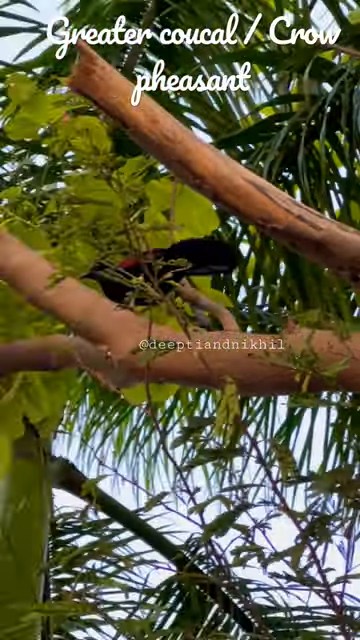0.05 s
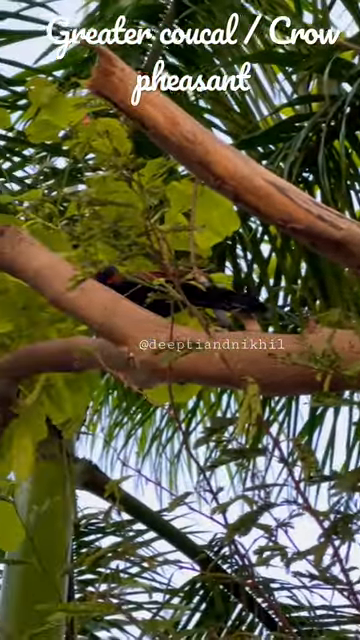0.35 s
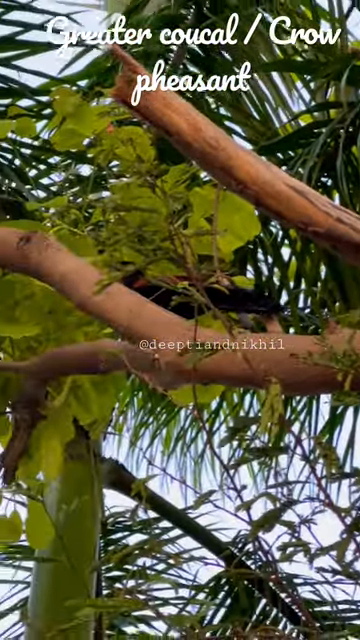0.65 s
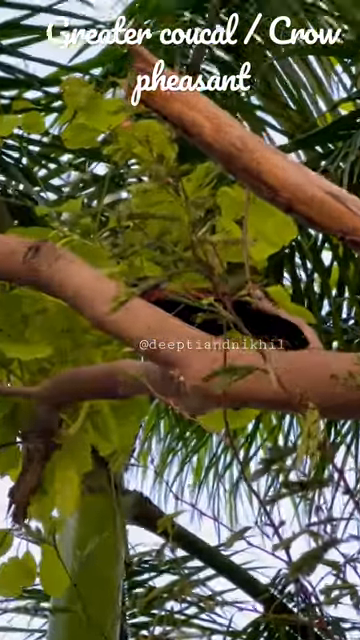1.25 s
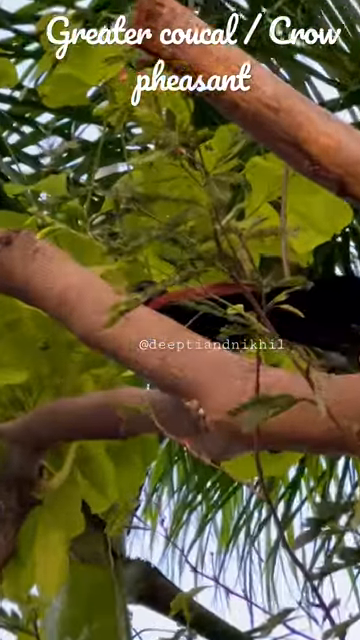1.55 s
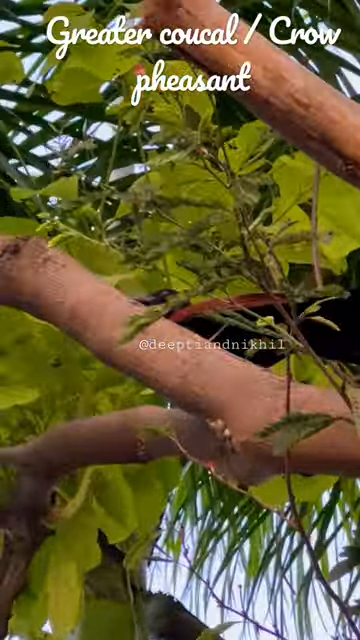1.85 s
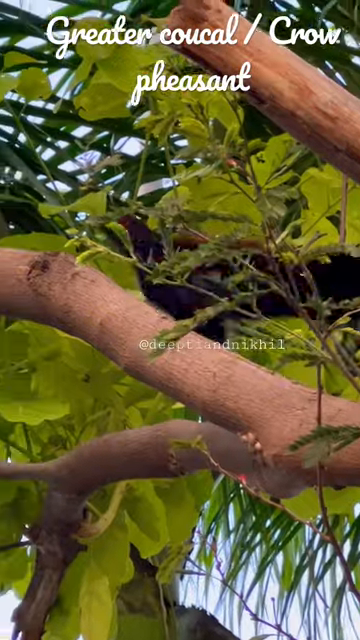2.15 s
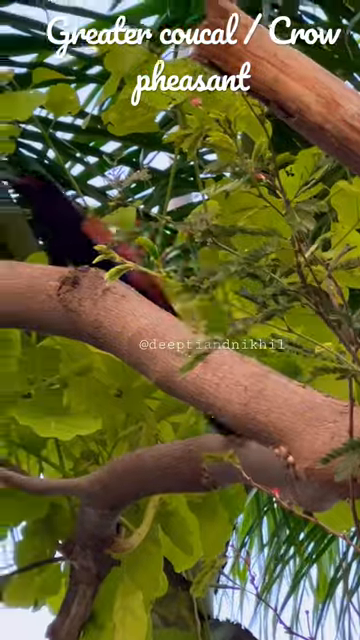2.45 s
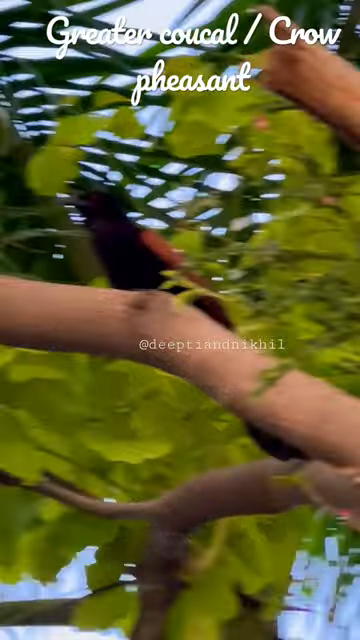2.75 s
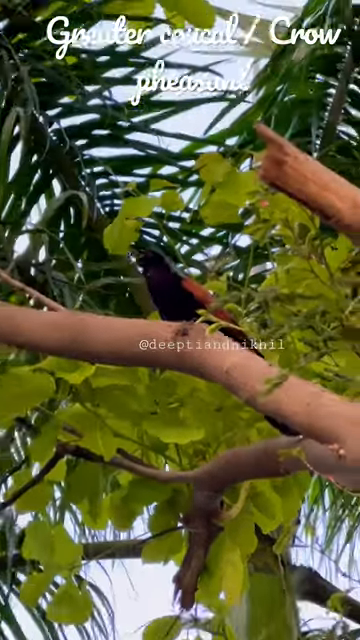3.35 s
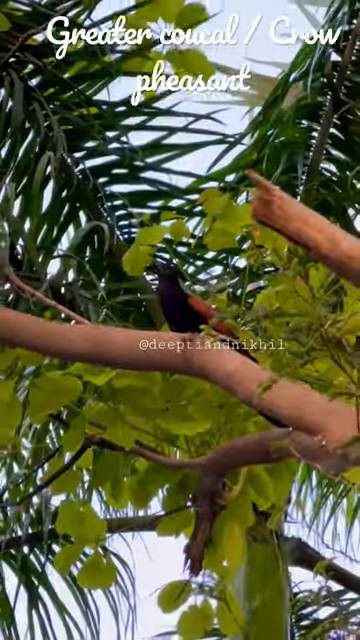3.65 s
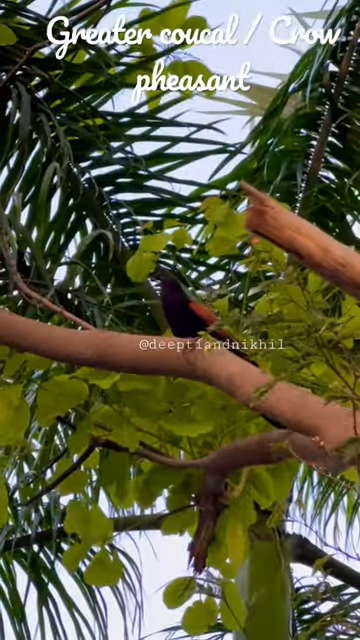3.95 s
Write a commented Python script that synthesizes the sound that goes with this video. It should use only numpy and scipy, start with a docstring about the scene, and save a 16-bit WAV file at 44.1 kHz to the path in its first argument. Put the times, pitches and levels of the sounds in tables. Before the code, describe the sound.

Birds trade short, low, hollow hoots in a leafy garden with faint chirps behind.

```python
"""A leafy garden where two coucals trade short, hollow hoots: one close and dry, one farther off
and echoing. Each hoot is a nearly pure tone from a swollen throat that dips in pitch and lifts again.
Small birds chirp faintly, twigs snap, leaves brush, and the hand-held microphone is bumped early on.
A distant engine hums under the hush of far traffic and foliage."""
import sys
import numpy as np
from scipy import signal
from scipy.io import wavfile

SR = 44100
rng = np.random.default_rng(int(sys.argv[2]) if len(sys.argv) > 2 else 0)


def generate_wav(signal):
    """Clip the signal to [-1, 1] and save it as 16-bit WAV at the path in sys.argv[1]."""
    frames = np.transpose(np.atleast_2d(signal))
    scaled = np.clip(frames, -1, 1) * 32767
    pcm = np.round(scaled).astype(np.int16)
    wavfile.write(sys.argv[1], SR, pcm)


N = 176400
TIME = np.arange(N) / SR
CUTOFF_HZ = 15100

# how alike left and right are for distant sound: f/Hz, likeness/0-1
LIKENESS = [(60, 1), (170, 0.98), (350, 0.6), (650, 0.3), (1300, 0.62), (2500, 0.79), (5000, 0.3),
            (11000, 0.3)]


def from_db(db):
    """Decibels to gain."""
    return 10 ** (np.asarray(db) / 20)


def unit_rms(x):
    """Scale to rms 1."""
    return x / np.sqrt(np.mean(x ** 2) + 1e-20)


def in_time(rows):
    """Join (t/s, value) rows by straight lines."""
    return np.interp(TIME, *np.transpose(rows))


def at_hz(rows, hz):
    """Read (f/Hz, value) rows on a log-frequency axis."""
    freqs, values = np.transpose(rows)
    return np.interp(np.log(hz), np.log(freqs), values)


def ease(x):
    """Smooth step from 0 to 1."""
    return .5 - .5 * np.cos(np.pi * np.clip(x, 0, 1))


def band(x, low_hz, high_hz):
    """Butterworth band-pass."""
    return signal.sosfilt(signal.butter(2, [low_hz, high_hz], "band", fs=SR, output="sos"), x + 1e-18)


def resonance(x, hz, width_hz):
    """One resonance, gain 1 at its peak."""
    return signal.lfilter(*signal.iirpeak(hz, hz / width_hz, fs=SR), x + 1e-18)


def drift(rate_hz):
    """Slow random wander, rms 1."""
    hop, settle = 40, 2000
    pole = np.exp(-2 * np.pi * rate_hz * hop / SR)
    white = rng.standard_normal(N // hop + settle + 2)
    slow = signal.lfilter([1], [1, -2 * pole, pole * pole], white)[settle:]
    return np.interp(np.arange(N) / hop, np.arange(len(slow)), unit_rms(slow))


def tone(hz):
    """Sine that follows a pitch curve."""
    return np.sin(2 * np.pi * np.cumsum(hz) / SR)


def stereo(mid, side, alike):
    """Mid and side to left and right: likeness 1 is mono, 0 is wide."""
    return np.sqrt((1 + alike) / 2) * mid + np.sqrt((1 - alike) / 2) * side * np.array([[1], [-1]])


def stereo_noise(alike, samples=N):
    """White noise with the given left-right likeness."""
    return stereo(*rng.standard_normal((2, samples)), alike)


def foliage(x, t60_s, alike, build_s):
    """Diffuse scatter from leaves and trunks: a reverb tail of dying noise."""
    t = TIME[:SR]
    fade = from_db(-60 * t / t60_s) * ease(t / build_s)
    tail = stereo_noise(alike, SR) * fade / np.sqrt(np.sum(fade ** 2))
    return signal.fftconvolve(x[None], tail, axes=1)[:, :N]


def hush():
    """Far traffic and leaves: a bed of flickering third-octave noise bands with a few faint whines."""
    # spectrum of the bed: f/Hz, relative density/dB
    spectrum = [(22, -25.5), (35, -8), (50, 2.5), (75, -1), (110, -1.5), (170, -6.5), (260, -13),
                (480, -15), (850, -19.5), (1350, -20.5), (2050, -24), (2800, -28), (4000, -33.5),
                (5800, -40), (7400, -42.5), (9000, -47.5), (12500, -51), (15000, -65.5)]
    # slow swell of the midrange and the whines: t/s, gain/dB
    midrange_swell = [(0, 1.5), (.7, -1), (1.1, 0), (1.4, 2), (2.2, 2), (3.0, 1), (4, 0.5)]
    # narrow tones in the bed: f/Hz, width/Hz, level before the swell/dB
    whine_bands = [(637, 39, -65.5), (916, 15, -63), (1034, 22, -64), (1220, 97, -58), (1461, 30, -59.5),
                   (1990, 160, -62), (2355, 20, -67.5), (7200, 320, -77.5)]
    swell_db = in_time(midrange_swell)
    edges = 20 * 2 ** (np.arange(30) / 3)
    white = rng.standard_normal((2, 2, N + SR // 2))
    bed, flicker_db = 0, 1.0
    for k, (low, high) in enumerate(zip(edges, edges[1:])):
        hz = np.sqrt(low * high)
        mid, side = band(white[k % 2], low, high)[:, -N:]
        midrange_share = np.exp(-(np.log2(hz / 1210) / 1.9) ** 2)
        band_db = at_hz(spectrum, hz) + midrange_share * swell_db + flicker_db * drift(8.8)
        bed += from_db(band_db) * stereo(mid, side, at_hz(LIKENESS, hz))
    whines = sum(from_db(db) * unit_rms(resonance(stereo_noise(at_hz(LIKENESS, hz)), hz, width))
                 for hz, width, db in whine_bands)
    pan = from_db([[0.17], [-0.17]])
    return (from_db(-39.5) * unit_rms(bed) + from_db(swell_db) * whines) * pan


def engine():
    """The low orders of a far engine hum, wavering a little in pitch and level."""
    # fader ride of the hum: t/s, level/dB
    ride = [(0, -41.5), (1.1, -57), (1.5, -42), (2.0, -37), (2.8, -38.5), (3.5, -37), (4, -50.5)]
    # engine orders: multiple of the turning rate, relative level/dB
    orders = [(2, -8.5), (3, -2), (4, -4), (7, -14.5)]
    turning_hz = 20.41 * (1 + .012 * drift(1.51))
    hum = sum(from_db(db + 2.5 * drift(1.9)) * tone(order * turning_hz) for order, db in orders)
    return from_db(in_time(ride)) * hum


def leaves():
    """Leaves brush together in soft swells of high noise."""
    # rustles: centre t/s, half length/s, level/dB, low f/Hz, high f/Hz
    rustles = [(0.05, 0.081, -58, 4740, 5640), (0.756, 0.076, -61.5, 3300, 9000),
               (1.974, 0.02, -67, 6090, 11010)]
    out = np.zeros((2, N))
    for centre, half_length, db, low_hz, high_hz in rustles:
        swell = np.exp(-((TIME - centre) / half_length) ** 2)
        out += from_db(db) * swell * unit_rms(band(stereo_noise(alike=0.48), low_hz, high_hz))
    return out


def small_birds():
    """Thin distant whistles, most sliding down and levelling off, blurred by the leaves around them."""
    # chirps: t/s, length/s, level/dB, opening f/Hz, closing f/Hz
    chirps = [(.212, 0.027, -44, 3020, 2920), (0.24, 0.063, -56.5, 3000, 2991),
              (1.409, 0.058, -52, 3026, 2930), (1.41, 0.045, -66, 6000, 5850),
              (1.662, 0.063, -50.5, 2750, 2693), (2.191, 0.093, -49.5, 3270, 2845),
              (2.398, 0.022, -53, 4580, 4560), (2.436, 0.085, -52.5, 3060, 2850),
              (2.691, 0.025, -53.5, 4720, 4530), (2.75, 0.066, -52.5, 3090, 2880),
              (3.263, 0.061, -51, 2970, 2990), (3.273, 0.07, -49.5, 2873, 2877),
              (3.278, 0.12, -53, 3315, 3300), (3.356, 0.092, -49, 3015, 2980),
              (3.382, 0.07, -53.5, 2880, 2864), (3.576, 0.12, -58.5, 2940, 2880)]
    whistles = np.zeros(N)
    quaver = 1 + 0.0074 * drift(130)
    edge_s = .012
    for start, length, db, open_hz, close_hz in chirps:
        t = TIME - start
        hz = close_hz + (open_hz - close_hz) * (1 - np.clip(t / length, 0, 1)) ** 2
        whistles += from_db(db) * ease(t / edge_s) * ease((length - t) / edge_s) * tone(hz * quaver)
    alike = at_hz(LIKENESS, 3020)
    blur = foliage(whistles, t60_s=0.078, alike=alike, build_s=edge_s)
    tail = foliage(whistles, t60_s=0.99, alike=alike, build_s=0.06)
    return from_db(-1.5) * whistles + from_db(-5) * blur + from_db(-7) * tail


def twigs():
    """Wood snaps in short cracks of noise; each sets a thick branch or a thin twig ringing."""
    # snaps: t/s, crack level/dB, decay/s, top f/Hz, kind of wood, ring level/dB
    snaps = [(0.0405, -32.5, 0.0016, 3700, "branch", -25.5), (0.0448, -38, 0.0047, 4630, "branch", -39),
             (.066, -43, 0.023, 2800, "branch", -42), (1.945, -42.5, 0.0043, 4950, "twig", -32),
             (1.9505, -45.5, 0.007, 6000, "twig", -40), (1.959, -42.5, 0.01, 4400, "twig", -46)]
    # modes of each kind of wood: f/Hz, width/Hz, relative level/dB
    wood_modes = {"branch": [(566, 100, -3), (750, 100, 0), (1450, 110, -6.5), (1770, 120, -7),
                  (2250, 150, -6.5), (3370, 280, -5.5), (4600, 86, -21)], "twig": [(1700, 380, -6),
                  (2510, 190, -1), (3950, 130, -6), (6540, 160, -15.5)]}
    out = np.zeros((2, N))
    for start, db, decay, top_hz, wood, ring_db in snaps:
        t = np.maximum(TIME - start, 0)
        burst = from_db(db) * stereo_noise(alike=0.48) * (t > 0) * np.exp(-t / decay)
        crack = signal.sosfilt(signal.butter(4, top_hz, fs=SR, output="sos"), burst + 1e-18)
        makeup_gain = np.sqrt(SR / 2 / top_hz)
        out += makeup_gain * band(crack, 1300, CUTOFF_HZ)
        for k, (hz, width, mode_db) in enumerate(wood_modes[wood]):
            ring = np.exp(-np.pi * width * t) * np.sin(2 * np.pi * hz * t)
            out += (-1) ** k * from_db(ring_db + mode_db) * ring
    return out


def handling():
    """A hand on the microphone: dull single-swing bumps over the rumble of the grip."""
    # rumble of the grip: t/s, level/dB
    grip = [(0, -37.5), (.1, -33), (.19, -40), (.31, -40), (.40, -29.5), (.48, -35), (.56, -40), (.68, -41),
            (.85, -63), (1.2, -70)]
    # bumps: t/s, peak level/dB, f/Hz
    bumps = [(0.075, -29, 100), (.103, -21.5, 140), (0.139, -24.5, 150), (.364, -25.5, 150),
             (.380, -25, 115), (0.394, -19, 135), (0.413, -19, 157), (0.443, -26, 136), (0.47, -25, 149),
             (0.514, -15, 170)]
    out = from_db(in_time(grip)) * unit_rms(band(stereo_noise(alike=0.98), 74, 142))
    for centre, db, hz in bumps:
        phase_squared = (np.pi * hz * (TIME - centre)) ** 2
        out += from_db(db) * (2 * phase_squared - 1) * np.exp(-phase_squared)
    return out


def garden_echo(direct, send):
    """Walls and trees return the send as early echoes; foliage adds a tail, even to the closest hoots."""
    # reflections: delay/s, gain/dB
    reflections = [(0.018, -9.5), (0.0229, -10.5), (0.0396, -13.5), (0.0493, -12), (0.0918, -10.5),
                   (0.1123, -14)]
    echoes = sum(from_db(db) * np.interp(TIME - delay, TIME, send, left=0) for delay, db in reflections)
    tail_feed = from_db(-12.5) * send + from_db(-26.5) * direct
    return echoes + foliage(tail_feed, t60_s=0.9, alike=0.72, build_s=0.06)


def coucals():
    """Hollow hoots from a swollen throat fall quickly, then climb; the farther ones carry more echo."""
    # hoots: t/s, length/s, level before the throat/dB, swell over the hoot/dB, opening f/Hz,
    # lowest f/Hz, closing f/Hz, middle of the fall/s, fall length/s, echo send/dB
    hoots = [(-0.064, 0.132, -19.5, -16.5, 335, 314, 349, 0.03, 0.03, -17),
             (0.193, 0.14, -12, 3.5, 383.5, 348.4, 385.7, 0.035, 0.028, -24.5),
             (0.345, 0.12, -34.5, -16, 388, 366.4, 384, 0.05, 0.035, -16),
             (0.598, 0.14, -13.5, 1.5, 374.8, 336.3, 373, 0.033, 0.031, -17),
             (1.301, 0.1367, -24, 9, 312, 303, 354, 0.025, 0.04, -5.5),
             (1.744, 0.1455, -21.5, -6, 427.5, 337.3, 380, 0.038, 0.024, -1.5),
             (2.174, 0.154, -20.8, -3.5, 428, 334.2, 374.6, 0.039, 0.023, -1),
             (2.589, 0.14, -21, -0.8, 439.5, 321.8, 349.3, 0.033, 0.03, -3),
             (2.993, 0.12, -21, 1.5, 383, 317.8, 334.5, 0.022, 0.027, -3),
             (3.36, 0.12, -22, 3, 346.6, 309.7, 326, 0.03, 0.026, -5.5),
             (3.503, 0.15, -17.5, 18, 320.3, 312.4, 353, 0.031, 0.033, -17),
             (3.904, 0.14, -11.5, 4, 363.3, 335, 363.8, 0.034, 0.024, -19)]
    attack_s, release_s = 0.023, 0.024
    rise_start_s, top_hold_s = 0.052, 0.011   # the climb tops out just before the end
    throat_top_hz = 404   # the throat radiates weakly above this pitch
    quaver = 1 + 0.0012 * drift(40)
    flutter = from_db(0.28 * drift(45))
    direct, send = np.zeros((2, N))
    for start, length, db, swell_db, open_hz, low_hz, close_hz, fall_at, fall_s, send_db in hoots:
        t = TIME - start
        fall = ease((t - fall_at) / fall_s + .5)
        rise = ease((t - rise_start_s) / (length - top_hold_s - rise_start_s))
        hz = (open_hz + (low_hz - open_hz) * fall + (close_hz - low_hz) * rise) * quaver * (t > 0)
        level = from_db(db + swell_db * (np.clip(t / length, 0, 1) - .5))
        envelope = ease(t / attack_s) * ease((length - t) / release_s)
        throat = 1 / np.sqrt(1 + (hz / throat_top_hz) ** 30)
        voice = tone(hz) + from_db(-47) * tone(2 * hz)
        hoot = level * envelope * flutter * throat * voice
        direct += hoot
        send += from_db(send_db) * hoot
    pan = from_db([[0.19], [-0.19]])
    return (direct + garden_echo(direct, send)) * pan


def scene():
    """The garden at the microphone."""
    return coucals() + small_birds() + twigs() + leaves() + handling() + engine() + hush()


def record(dry):
    """A steep low-pass takes off the very top."""
    return signal.sosfilt(signal.cheby2(12, 70, CUTOFF_HZ + 900, fs=SR, output="sos"), dry)


dry = scene()
out = record(dry)
generate_wav(out)
```